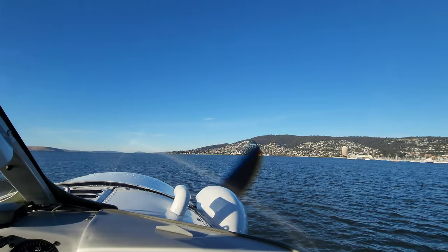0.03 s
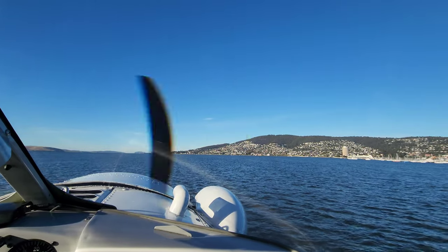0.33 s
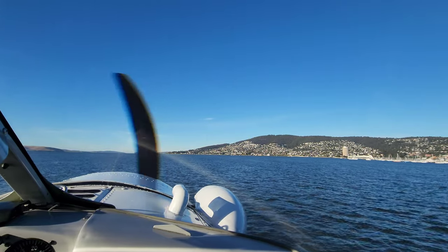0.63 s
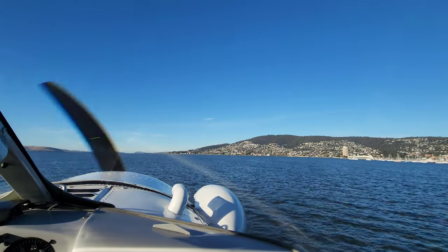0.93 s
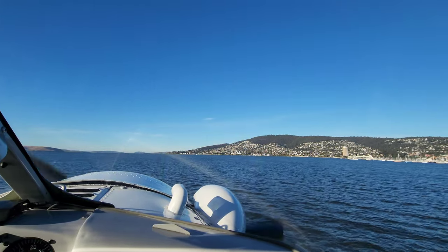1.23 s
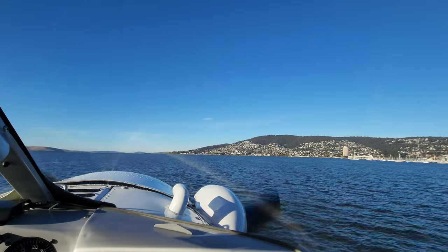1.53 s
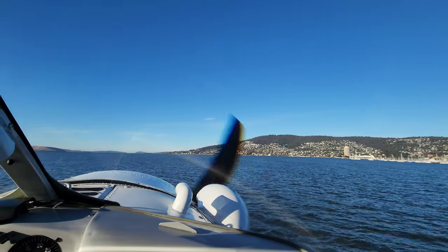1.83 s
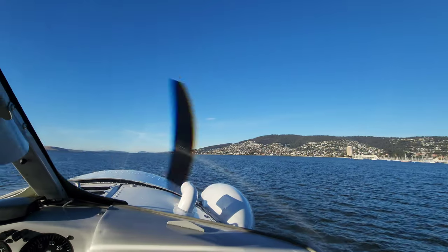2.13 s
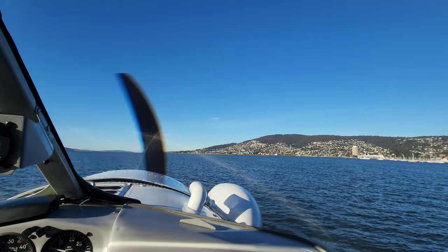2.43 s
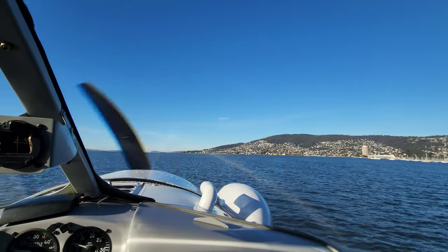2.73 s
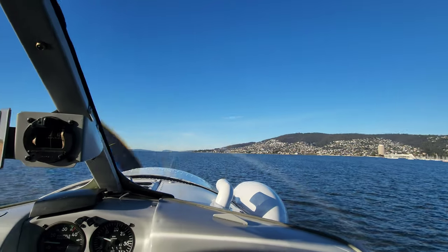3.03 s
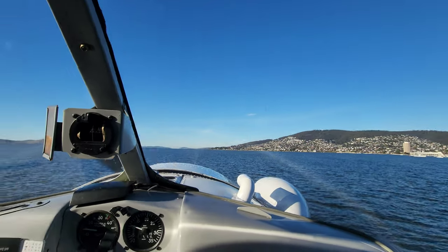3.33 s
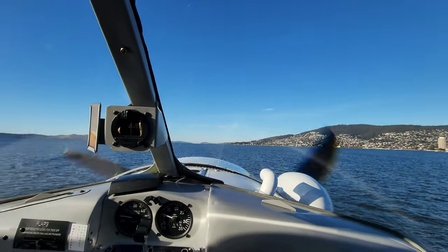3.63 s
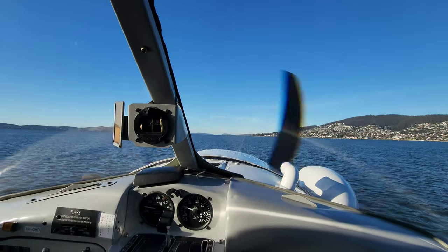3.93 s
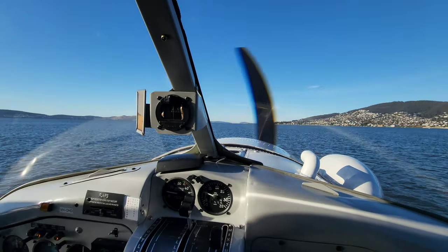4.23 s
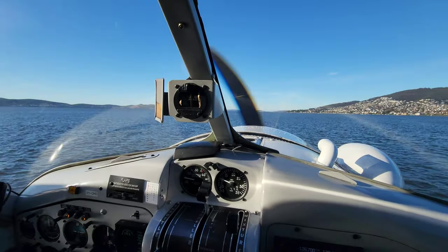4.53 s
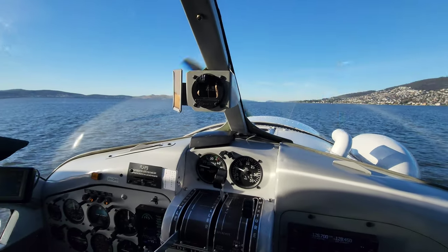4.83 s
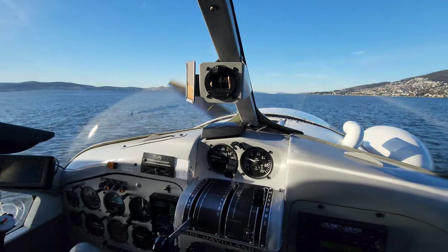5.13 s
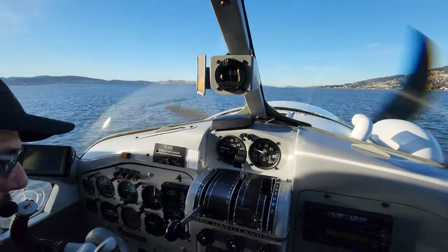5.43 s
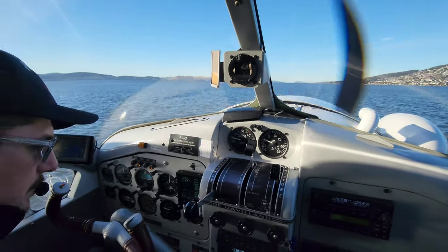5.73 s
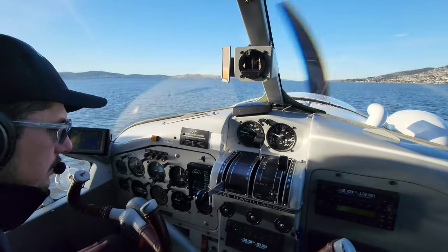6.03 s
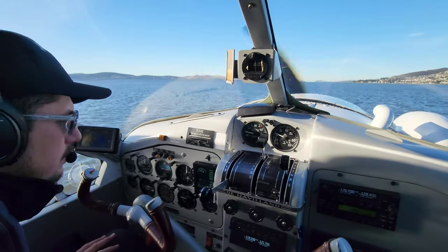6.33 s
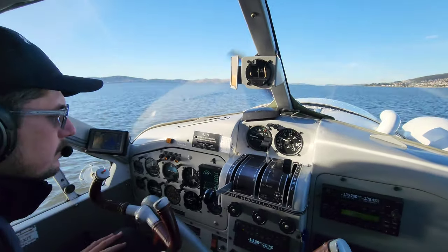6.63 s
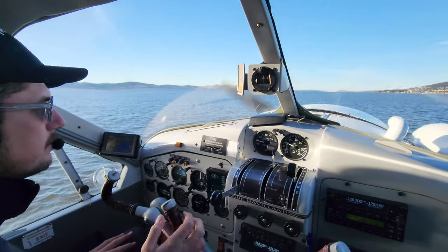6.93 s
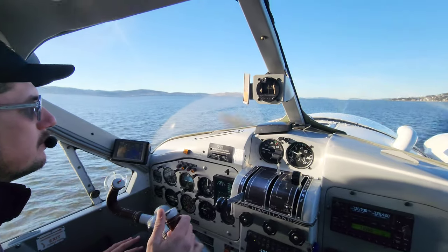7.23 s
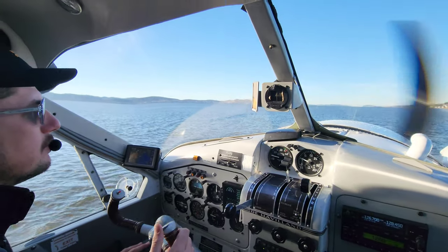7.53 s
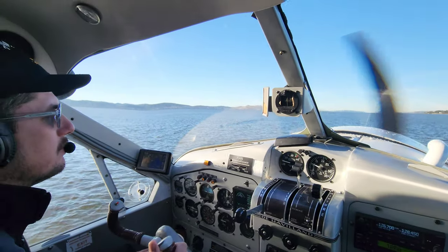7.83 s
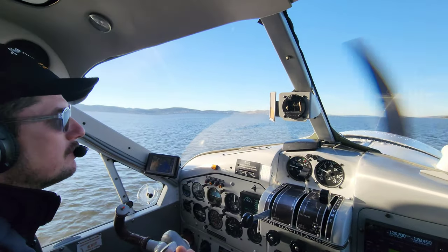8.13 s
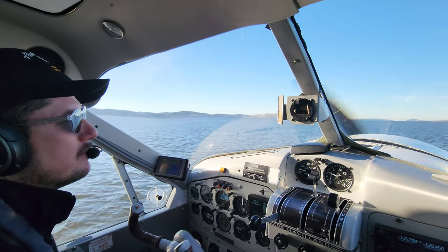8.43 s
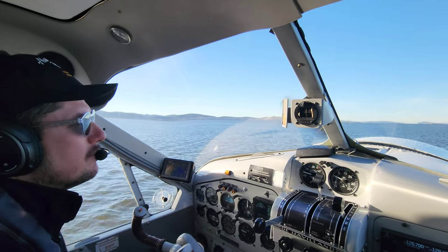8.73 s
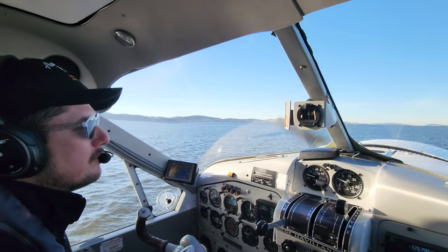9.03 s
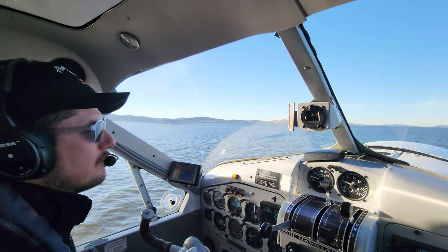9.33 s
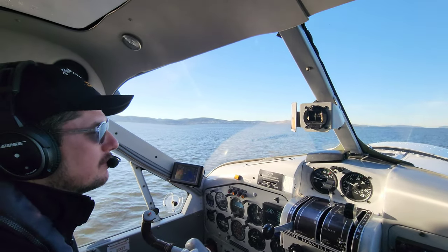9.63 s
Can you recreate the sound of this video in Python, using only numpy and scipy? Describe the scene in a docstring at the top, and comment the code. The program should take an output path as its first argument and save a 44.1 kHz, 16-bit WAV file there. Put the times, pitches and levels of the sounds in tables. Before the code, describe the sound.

Inside a taxiing floatplane, the propeller engine throbs low and even, with mechanical ticking, cabin rumble and a faint wavering ring.

```python
"""Floatplane taxiing, from the cockpit

A nine-cylinder radial engine idles at about 1050 rpm on open water. Unequal exhaust pulses ring the
cabin into a loping boom; the cowling hums, valve gear clatters and gears whine. Behind it the skin
rumbles, overtones and buzzes come and go, a panel sings and propeller wash hisses on the windscreen.
The balance drifts as the listener turns slowly from the windscreen to the side window."""
import sys
import numpy as np
from scipy.fft import rfft, irfft, next_fast_len
from scipy.io import wavfile
from scipy.ndimage import map_coordinates

SR = 44100
rng = np.random.default_rng(int(sys.argv[2]) if len(sys.argv) > 2 else 0)


def bounce(signal):
    """Save signal as a 16-bit WAV file at the path given by the first command-line argument."""
    frames = np.transpose(np.atleast_2d(signal))
    limited = np.clip(frames, -1, 1)
    pcm = np.round(limited * 32767).astype(np.int16)
    wavfile.write(sys.argv[1], SR, pcm)


N = 436149
LEAD = SR // 2  # samples of pre-roll and post-roll
TIME = np.arange(-LEAD, N + LEAD) / SR


def amp(db):
    """Decibels to gain."""
    return 10 ** (np.asarray(db) / 20)


def unit(x):
    """Scale to rms 1."""
    return x / np.sqrt(np.mean(x ** 2) + 1e-20)


def along(points, hz):
    """Read (f/Hz, value) points on a log frequency axis."""
    f, values = np.transpose(points)
    return np.interp(np.log(hz + 1), np.log(f + 1), values)


def curves(rows):
    """One automation curve for each column after t/s."""
    times, *columns = np.transpose(rows)
    return [np.interp(TIME, times, column) for column in columns]


def wobble(rate):
    """A smooth random curve with `rate` knots a second."""
    at = (TIME - TIME[0]) * rate
    return map_coordinates(rng.standard_normal(int(at[-1]) + 4), [at])


def bump(centre_s, half_s):
    """A bell-shaped swell of height 1."""
    return np.exp(-((TIME - centre_s) / half_s) ** 2)


def filtered(x, response):
    """Filter x with a complex gain given as a function of frequency."""
    size = next_fast_len(len(TIME) + LEAD)
    hz = np.fft.rfftfreq(size, 1 / SR)
    return irfft(rfft(x, size) * response(hz), size)[..., :len(TIME)]


def band(x, edge_hz, steepness, centre_hz=0):
    """Pass what lies within edge_hz of the centre: a low-pass when the centre is 0."""
    return filtered(x, lambda f: 1 / (1 + ((f - centre_hz) / edge_hz) ** steepness))


def white():
    """Two unrelated white noises."""
    return rng.standard_normal((2, len(TIME)))


def spread(pair, spectrum):
    """Colour two unrelated signals and mix them into the cabin's stereo field, rms 1."""
    # likeness of the two sides: f/Hz, correlation
    likeness = [(60, .99), (130, .96), (210, .87), (330, .52), (500, .58), (770, .2), (1100, -.22),
                (1500, -.18), (2300, .12), (3200, -.1), (7300, .02), (7700, .86), (15000, .84)]

    def mid_side(hz):
        angle = np.arccos(np.clip(along(likeness, hz), -1, 1)) / 2
        return amp(along(spectrum, hz)) * np.array([np.cos(angle), np.sin(angle)])

    mid, side = filtered(pair, mid_side)
    return unit(np.array([mid + side, mid - side]))


def rattle(cycle, repeat_share, morph_s=4.57):
    """Noise of which a share returns every engine cycle, in a slowly morphing pattern."""
    size = int(len(cycle) / (cycle[-1] - cycle[0]))
    position = (cycle % 1 * size).astype(int) % size
    first, second = rng.standard_normal((2, 2, size))[..., position]
    angle = np.pi / 2 * TIME / morph_s
    pattern = np.cos(angle) * first + np.sin(angle) * second
    return np.sqrt(repeat_share) * pattern + np.sqrt(1 - repeat_share) * white()


def surges():
    """Short surges and lulls in the midrange: a clatter curve and a wash curve, in dB."""
    # surges: t/s, half length/s, clatter/dB, wash/dB
    moments = [(.28, .08, 1, 1.5), (0.623, .05, 0.5, 0.5), (.88, 0.06, 2.5, -1), (1.37, .08, 0.5, 1.5),
               (2.15, .08, 1, 0.5), (2.85, .06, 2.5, 0), (3.948, .09, 1, 0), (4.13, .05, 0, -1),
               (4.3, .05, 1.5, -0.5), (4.53, .06, 1, 0), (5.55, 0.22, .7, 0.5), (6.6, 0.098, 2, 1),
               (6.9, .06, 0.5, -0.5), (7.13, .06, 3, 1), (7.436, .05, 2.8, 0), (9.223, .05, 1.5, 0),
               (9.33, 0.087, 1, 2)]
    return sum(np.outer(gains_db, bump(t, half)) for t, half, *gains_db in moments)


def lope(cycle, lag_cycles=0.0067):
    """Cylinders hit unequally hard: a boom curve and a bark curve, in dB, looping each cycle."""
    # accents in firing order: boom/dB, bark/dB
    accents = [(2.4, -4.5), (2, -12), (-1, -7), (-3.5, 1.5), (-1.3, 1), (3.6, 1.2), (.2, -5), (-3.5, 3.3),
               (-2, 0)]
    position = (cycle - lag_cycles) % 1 * len(accents)
    return [map_coordinates(column, [position], mode="grid-wrap") for column in np.transpose(accents)]


def slipstream(cycle, wash_gain_db=4.0, hiss_db=-46, hiss_follows=0.43, split_hz=7400):
    """Propeller wash rushes on the windscreen; low and high hiss flutter partly on their own."""
    # wash, nearly steady with slight swells: t/s, level/dB
    wash_ride = [(0, -49.5), (2.5, -49), (4.4, -48.5), (6.3, -50), (7.2, -49.5), (8.2, -50.5), (9.89, -49)]
    # midrange rush: f/Hz, relative level/dB
    wash_spectrum = [(200, -16), (500, -2.5), (1000, -7), (1450, 3.5), (1800, 0.5), (2050, 0.5), (2450, -3),
                     (2750, -5), (3200, -7.5), (4500, -14.5), (8000, -46)]
    # bright hiss: f/Hz, relative level/dB
    hiss_spectrum = [(500, -60), (1800, -17), (3200, -5), (4300, 2), (5100, 0.5), (5400, 2.5), (5900, -.5),
                     (6300, 1), (6900, -1.5), (7500, 2), (7900, -1), (8300, 2), (8800, -3), (9450, -3),
                     (10050, -5), (10300, -2.5), (10950, -5), (11450, -2), (12200, -4.5), (13600, -5.5),
                     (15700, -6)]

    def flutter():  # dB; brief dips, hardly any peaks
        return 2.0 * (1 - np.exp(-0.5 * wobble(95)))

    ride_db = curves(wash_ride)[0]
    swish_db = 0.03 * np.cos(2 * np.pi * 2 * cycle)  # a trace of swell once a turn
    shared = flutter()
    motion_db = surges()[1] + 0.7 * wobble(5.9) + 0.87 * (swish_db + shared)
    rush = spread(rattle(cycle, repeat_share=0.14), wash_spectrum)
    wash = amp(ride_db + wash_gain_db + motion_db) * rush
    follow_db = hiss_follows * (ride_db - ride_db.mean())
    hiss = amp(hiss_db + follow_db + swish_db) * spread(white(), hiss_spectrum)
    low = band(hiss, split_hz, steepness=20)
    return wash + amp(shared + flutter()) * low + amp(0.59 * shared + flutter()) * (hiss - low)


def airframe(level_db=-30.5, waver_db=1.3):
    """The skin rumbles in the propeller's wake."""
    # low rumble: f/Hz, relative level/dB
    spectrum = [(5, -15), (20, -16), (30, -7), (55, -2.5), (78, -2.5), (105, 0), (135, -4.5), (180, -6),
                (230, -11), (275, -21), (380, -24), (600, -45), (1200, -93)]
    return amp(level_db + waver_db * wobble(3.7)) * spread(white(), spectrum)


def overtones_and_buzzes():
    """Engine overtones and cabin buzzes swell and settle again, each a narrow band of noise."""
    # overtones and buzzes: t/s, half length/s, f/Hz, half width/Hz, level/dB
    swells = [(1.4, 1.3, 963, 32, -52.5), (1.5, 1.5, 1266, 4, -58), (1, .3, 474, 6, -49),
              (2.3, .2, 470, 9.1, -55), (3.5, 0.7, 920, 40, -54), (3.985, 0.06, 975, 100, -46),
              (4.47, 0.27, 790, 3.5, -50), (4.55, .45, 840, 45, -52), (5.3, 0.84, 944, 25, -53),
              (6.3, 0.66, 850, 70, -53), (7.6, 0.9, 780, 68, -53), (7.7, .6, 583, 20, -55),
              (8.4, 1.7, 512, 16, -58), (9.45, 0.35, 665, 45, -54)]
    sound = np.zeros(len(TIME))
    for t, half, hz, width, db in swells:
        swell = bump(t, half)
        ring = band(rng.standard_normal(len(TIME)), width, steepness=2, centre_hz=hz)
        rms = np.sqrt(np.average(ring ** 2, weights=swell ** 2))
        sound += amp(db) * swell * ring / rms
    return sound


def panel(pitch_hz=418.7, wander_rad=0.8, gain_db=-2.0, swell_db=4.0):
    """A panel sings at one wavering pitch, swells at random and now and then flares up."""
    # steady song, loudest facing the dashboard: t/s, level/dB
    ride = [(0, -48), (3.2, -48), (4.7, -45.5), (5.8, -45), (6.5, -46.5), (7.2, -47), (8.3, -50.5),
            (9.89, -48)]
    # flares: t/s, half length/s, level/dB
    flares = [(0.048, .04, -40.5), (0.393, .07, -41.5), (0.982, 0.067, -39.5), (1.748, 0.053, -43.5),
              (2.1, 0.047, -43), (2.37, 0.066, -40), (2.857, 0.06, -37), (3.6, .06, -38.5),
              (3.767, 0.028, -37), (3.968, 0.06, -38), (4.443, 0.065, -36), (4.68, 0.065, -35.5),
              (4.893, 0.082, -36), (5.15, 0.045, -40), (5.483, .06, -37.5), (5.677, 0.082, -40.5),
              (5.95, 0.05, -42), (6.56, 0.064, -41.5), (6.77, 0.082, -42.5), (8.92, 0.041, -43),
              (9.56, .07, -46)]
    song = amp(curves(ride)[0] + swell_db * np.tanh(2 * wobble(11)))
    flaring = sum(amp(db) * bump(t, half) for t, half, db in flares)
    tone = unit(np.sin(2 * np.pi * pitch_hz * TIME + wander_rad * wobble(9)))
    return amp(gain_db) * np.hypot(song, flaring) * tone


def gears(cycle, gain_db=-1, waver_db=2):
    """Accessory gears whine, reaching each side with its own drifting phase."""
    # shaft and mesh tones: multiple of crankshaft speed, relative level/dB
    tones = [(16.5, -59.5), (21, -63.5), (27, -64.5), (33, -63.5), (36, -58), (45, -69), (54, -63),
             (72, -66), (128.3, -72), (144, -70.5), (149.8, -76), (158.1, -73.5), (168, -70)]
    # whine, swelling and easing: t/s, gain/dB
    ride = [(0, 6), (2, 2.5), (4.5, 6), (7, 2.5), (9.89, 4.5)]
    whine = np.zeros((2, len(TIME)))
    for multiple, db in tones:
        drift_rad = np.array([wobble(20), wobble(20)])
        phase = 2 * np.pi * 2 * multiple * cycle + drift_rad
        whine += amp(db + waver_db * wobble(9)) * np.sqrt(2) * np.sin(phase)
    return amp(gain_db + curves(ride)[0]) * whine


def valve_gear(cycle, gain_db=-0.17, beat_db=0.95, waver_db=0.46):
    """Rockers and tappets clatter in a pattern that partly returns with each engine cycle."""
    # clatter reaching the turning listener: t/s, level/dB
    ride = [(0, -40.5), (2.2, -40.5), (3.4, -39.5), (4.4, -39), (5.2, -39.5), (6.3, -40.5), (7.4, -41),
            (8.4, -41.5), (9.5, -39.5)]
    # midrange clatter: f/Hz, relative level/dB
    spectrum = [(250, -10), (350, -11), (400, -10.5), (480, 0), (600, -1.5), (720, -4), (950, -7),
                (1200, -7.5), (1700, -21), (3500, -64)]
    beat = beat_db * np.cos(2 * np.pi * 4 * cycle)  # twice a turn
    level_db = curves(ride)[0] + gain_db + surges()[0] + beat + waver_db * wobble(15)
    return amp(level_db) * spread(rattle(cycle, repeat_share=0.47), spectrum)


def cowling(cycle, gain_db=-0.2, boom_share=0.68):
    """The engine shakes its metal shell into a rough hum that swells with each exhaust boom."""
    # hum: t/s, level/dB
    ride = [(0, -42), (1.5, -41), (3, -42), (4.5, -40), (5.4, -41.5), (6.2, -45.5), (7, -45), (8, -43.5),
            (9.89, -46.5)]
    # ring of the shell: f/Hz, relative level/dB
    spectrum = [(120, -50), (250, -16), (275, -12), (292, -1), (325, -1), (350, -5.5), (370, -9.5),
                (388, -10.5), (440, -10), (700, -46), (2000, -100)]
    swell = amp(boom_share * lope(cycle)[0])
    hum = spread(rattle(cycle, repeat_share=0.5), spectrum)
    return amp(curves(ride)[0] + gain_db) * unit(swell * hum)


def firings(cycle, level_db=43.0, jitter_ms=0.065):
    """Nine unequal exhaust pulses in every two turns, each slightly off its beat."""
    # each cylinder's path to the exhaust, in firing order: delay/ms, strength/dB
    cylinders = [(1.11, -4.1), (2.08, .2), (3.55, -7.3), (2.66, 5.4), (-.47, 2.7), (2.38, -.45), (1.62, .9),
                 (3.67, -.2), (.91, 2.9)]
    count = len(cylinders)
    firing = np.arange(np.ceil(cycle[0] * count), cycle[-1] * count).astype(int)
    delay_ms, strength_db = np.array(cylinders)[firing % count].T
    late_ms = delay_ms + jitter_ms * rng.standard_normal(len(firing))
    onset_s = np.interp(firing / count, cycle, TIME) + late_ms / 1000
    at = np.clip(np.round(onset_s * SR).astype(int) + LEAD, 0, len(TIME) - 1)
    return np.bincount(at, amp(level_db + strength_db), len(TIME))


def cabin_response(f, right_lead_ms=0.29):
    """Exhaust and cabin resonate, the walls keep the crack out, and the right side hears it first."""
    # resonances: f/Hz, width/Hz, level/dB
    modes = [(43.2, 10.1, -8.9), (73.5, 8.5, -1.4), (110, 6, -10.9), (144.8, 98.7, -16.1),
             (178.1, 13.7, -3), (221.8, 6, -18), (248.1, 40.9, -24.4), (295.5, 18.1, -34.2),
             (131.4, 6, -13.2), (184.6, 6, -8.1)]
    # through the walls: f/Hz, gain/dB
    walls = [(250, 0.0), (290, -5.0), (450, -22.5), (800, -15.0), (2000, -34), (6000, -75)]
    ring = sum((-1) ** k * amp(db) * 1j * f * width / (hz * hz - f * f + 1j * f * width)
               for k, (hz, width, db) in enumerate(modes))
    arrival = np.exp(np.pi * 1j * np.outer([-1, 1], f) * right_lead_ms / 1000)
    return ring * amp(along(walls, f)) * arrival


def exhaust(cycle, boom_hz=125, deep_hz=168, bark_hz=203, uneven_db=0.47):
    """Exhaust pulses ring the cabin: a steady drone under a loping boom and bark."""
    # standing waves at the listener's changing place: t/s, deep drone/dB, boom/dB, bark/dB
    balance = [(0, 0.5, 0.5, 1), (1.2, 0, 1.5, 0.5), (3, 0.8, -0.5, -2.5), (4.9, 1, -4.5, -3),
               (6.2, 0.5, -1.8, -1), (7.5, 0.4, 0.1, 3), (8.6, 0.4, 1.5, 2), (9.89, 0.5, 0.7, 3)]
    deep_db, boom_db, bark_db = curves(balance)
    boom_beat_db, bark_beat_db = lope(cycle)
    ringing = filtered(firings(cycle), cabin_response)
    drone = band(ringing, boom_hz, steepness=10)
    bark = ringing - band(ringing, bark_hz, steepness=20)
    loping = drone + amp(boom_beat_db) * (ringing - drone - bark)
    deep = band(loping, deep_hz, steepness=30)  # the two lowest firing tones fill the cabin evenly
    bark_gain = amp(bark_db + bark_beat_db + uneven_db * wobble(18))
    return amp(deep_db) * deep + amp(boom_db) * (loping - deep) + bark_gain * bark


def standing_waves(x):
    """Two bands dip and swell as the listener drifts out of one node and into another."""
    # lower and upper standing wave: f/Hz, half width/Hz
    pitches = [(252, 20), (385, 49)]
    # their strength at the listener: t/s, lower/dB, upper/dB
    rides = [(0, -3.5, 4), (2.5, 0, 4), (5.3, 2.5, 1.5), (6.2, 3, 1.5), (7.2, 0.5, -3), (8.8, -1, -1),
             (9.89, 0, 0)]
    bands = [band(x, width, steepness=4, centre_hz=hz) for hz, width in pitches]
    return x + sum((amp(db) - 1) * wave for db, wave in zip(curves(rides), bands))


def scene():
    """One crankshaft times the engine's layers; they mix with the airframe's noises in the cockpit."""
    # crankshaft: t/s, speed/rpm
    speed = [(0.0, 1054.8), (1.5, 1055.4), (3.0, 1057.5), (4.5, 1056.8), (6.0, 1054.4), (7.0, 1055.8),
             (8.0, 1056.5), (9.0, 1059.2), (9.89, 1060.3)]
    # stereo lean: f/Hz, left minus right/dB
    lean = [(40, .2), (100, -.2), (150, -.8), (205, -6), (260, -5), (340, -3), (425, 1.5), (620, -3),
            (1000, -2), (4500, -3), (7500, -2), (9500, -.2), (15000, -1)]
    cycle = np.cumsum(curves(speed)[0]) / (120 * SR)  # four-stroke cycles, two turns each
    cycle -= cycle[LEAD]
    engine = standing_waves(exhaust(cycle) + cowling(cycle) + valve_gear(cycle)) + gears(cycle)
    cockpit = engine + airframe() + panel() + overtones_and_buzzes() + slipstream(cycle)
    panned = filtered(cockpit, lambda hz: amp(np.outer([0.5, -0.5], along(lean, hz))))
    return panned[:, LEAD:LEAD + N]


def record(dry, top_hz=15750):
    """A brick-wall low-pass takes off the very top of the hiss."""
    padded = np.pad(dry, ((0, 0), (LEAD, LEAD)), "reflect", reflect_type="odd")
    return filtered(padded, lambda hz: hz < top_hz)[:, LEAD:LEAD + N]


dry = scene()
out = record(dry)
bounce(out)
```